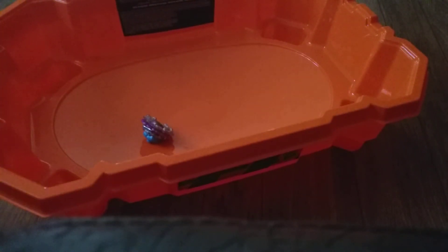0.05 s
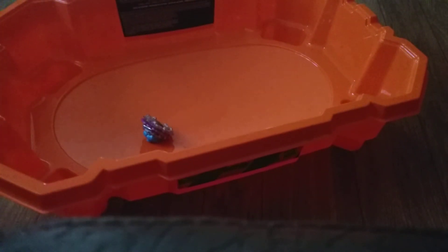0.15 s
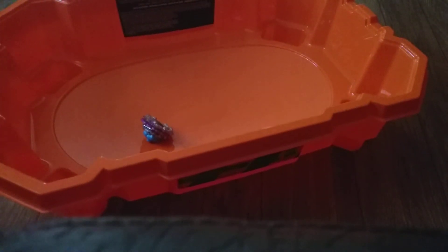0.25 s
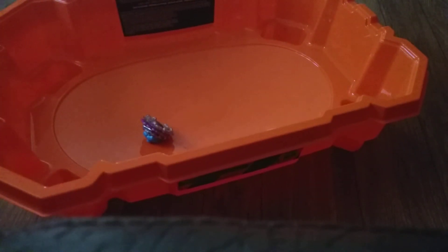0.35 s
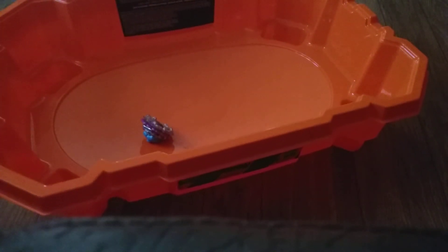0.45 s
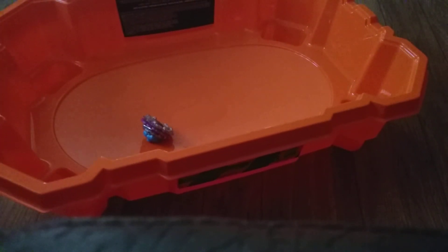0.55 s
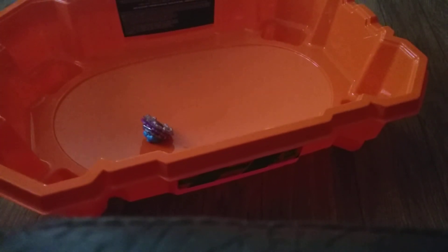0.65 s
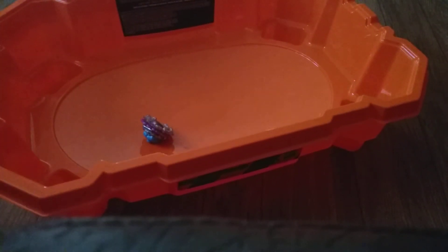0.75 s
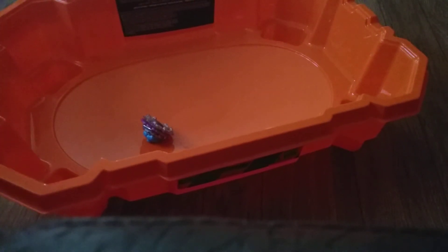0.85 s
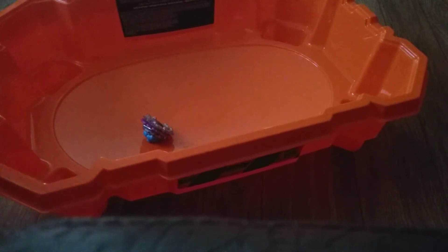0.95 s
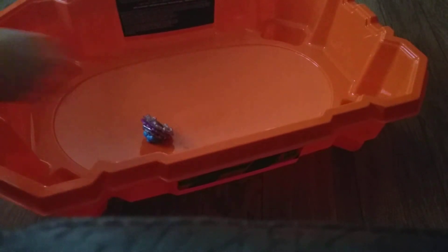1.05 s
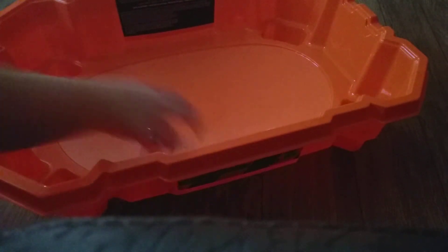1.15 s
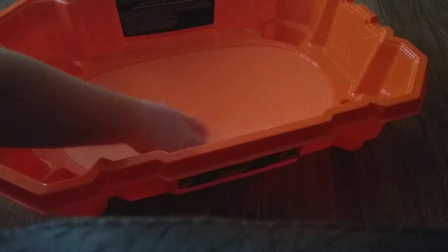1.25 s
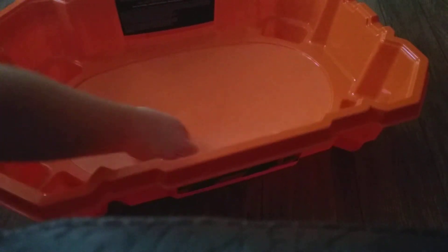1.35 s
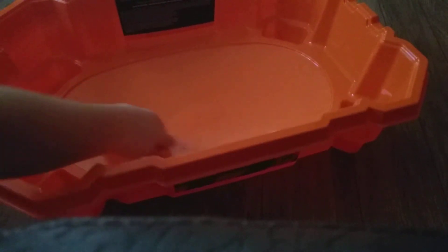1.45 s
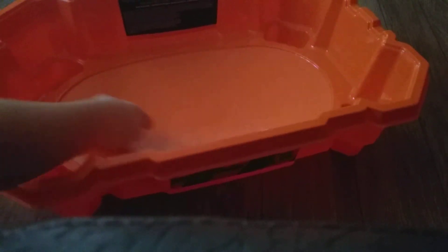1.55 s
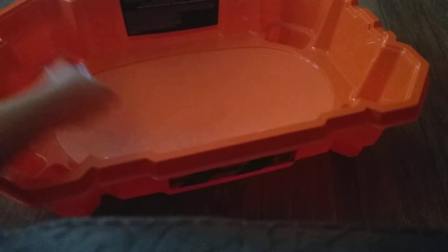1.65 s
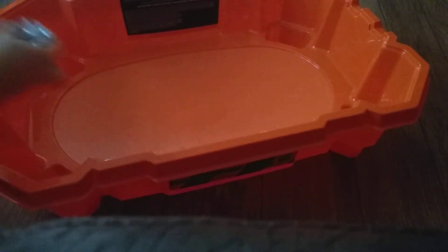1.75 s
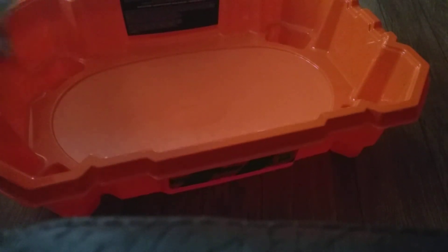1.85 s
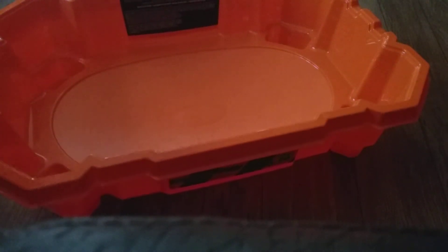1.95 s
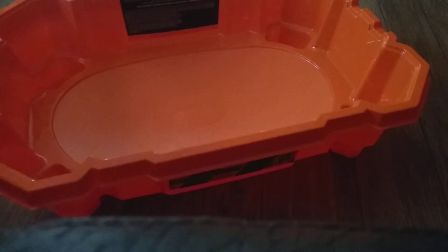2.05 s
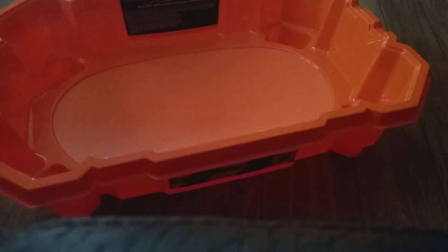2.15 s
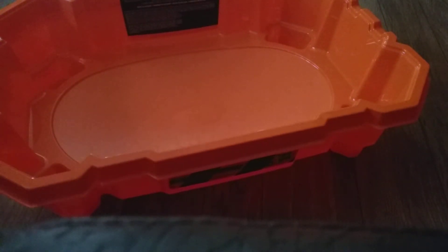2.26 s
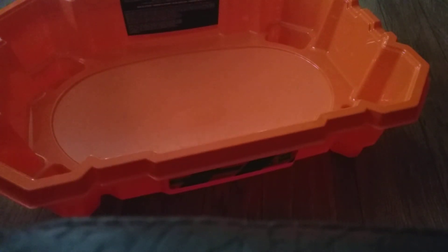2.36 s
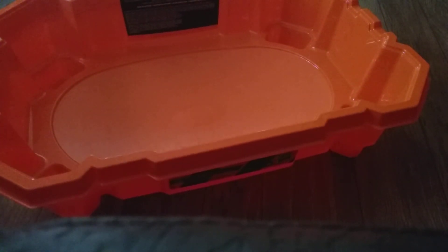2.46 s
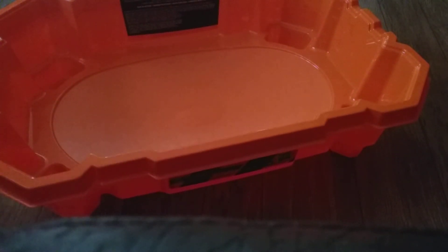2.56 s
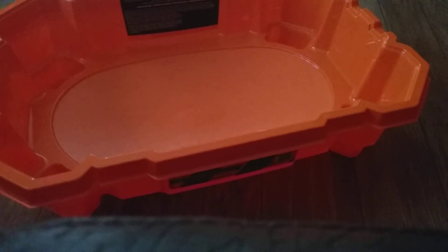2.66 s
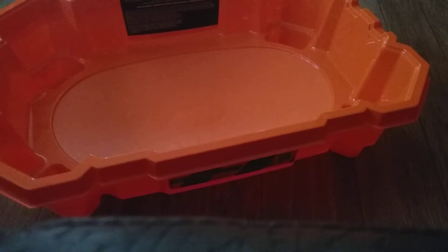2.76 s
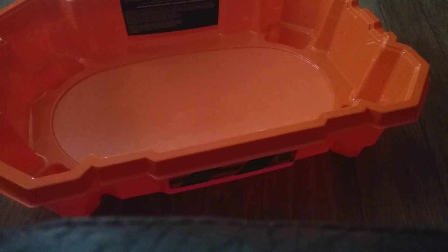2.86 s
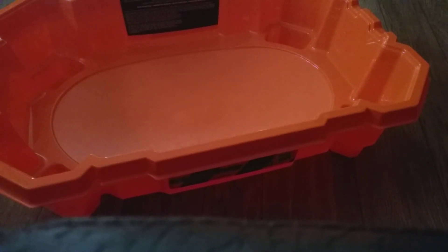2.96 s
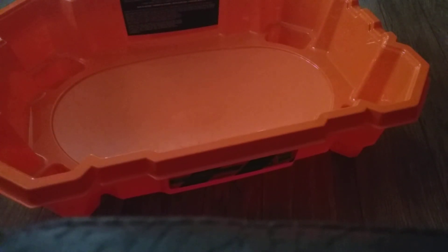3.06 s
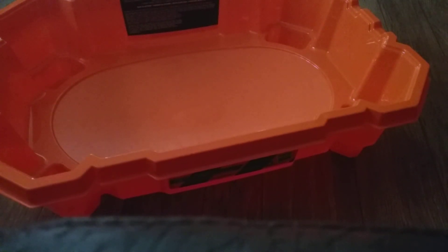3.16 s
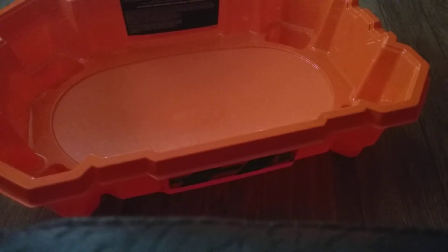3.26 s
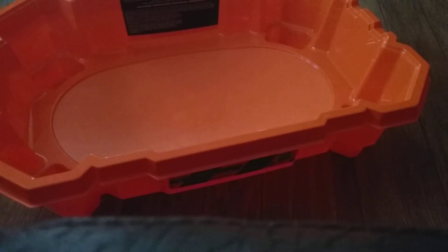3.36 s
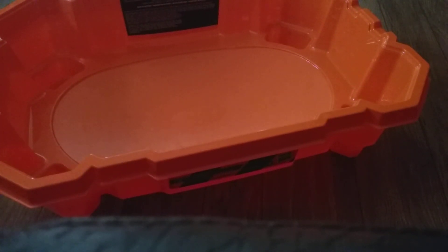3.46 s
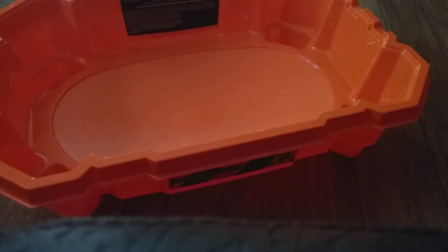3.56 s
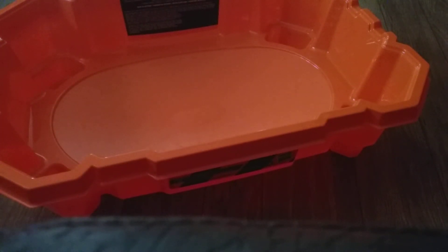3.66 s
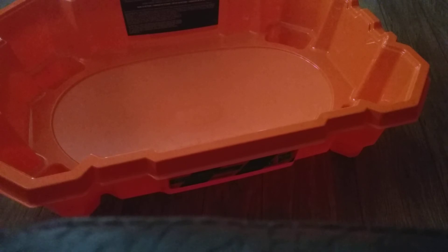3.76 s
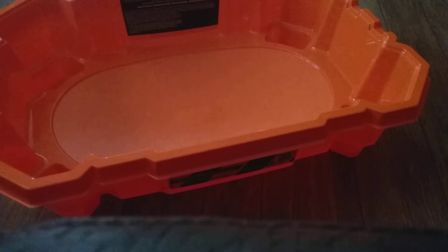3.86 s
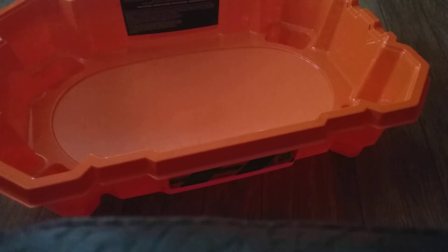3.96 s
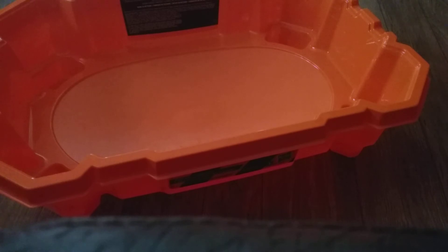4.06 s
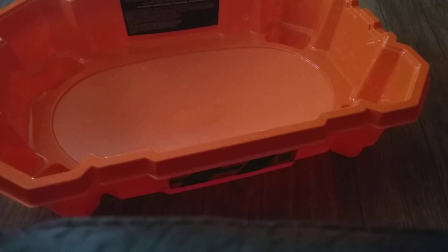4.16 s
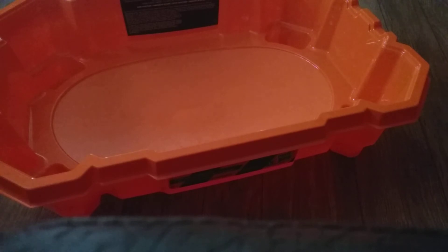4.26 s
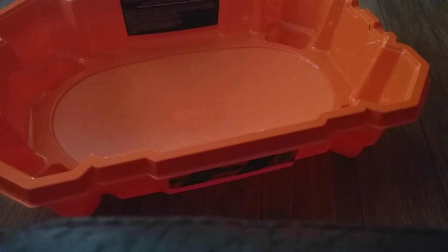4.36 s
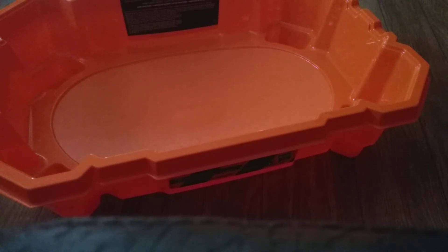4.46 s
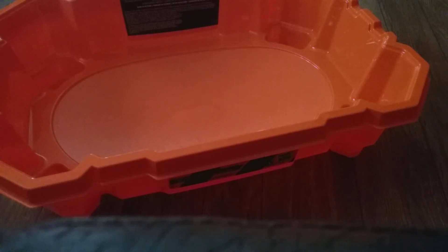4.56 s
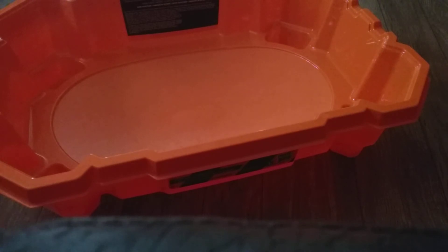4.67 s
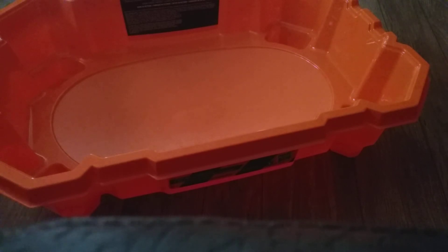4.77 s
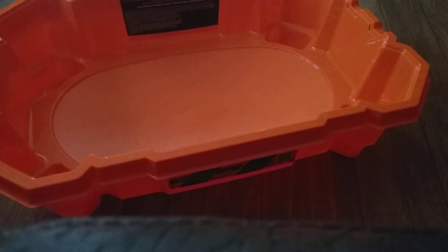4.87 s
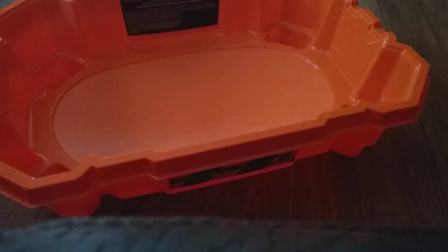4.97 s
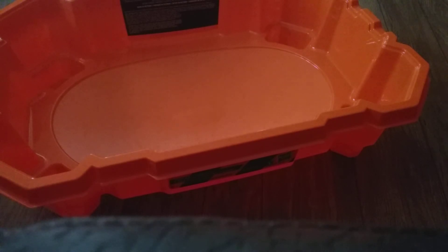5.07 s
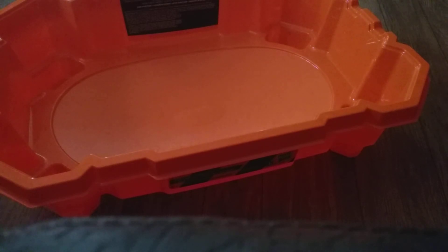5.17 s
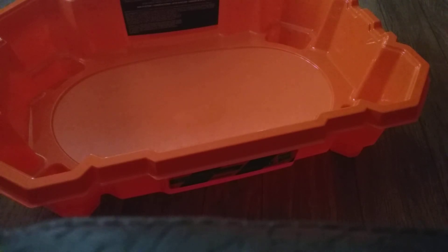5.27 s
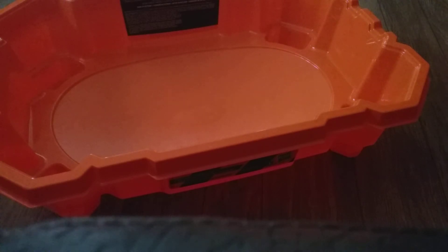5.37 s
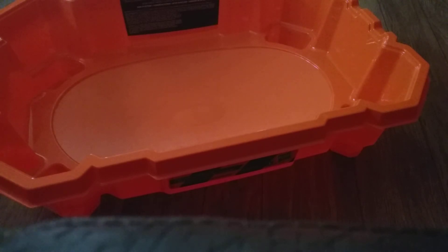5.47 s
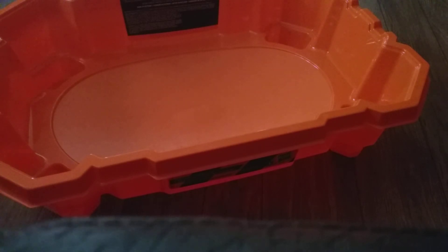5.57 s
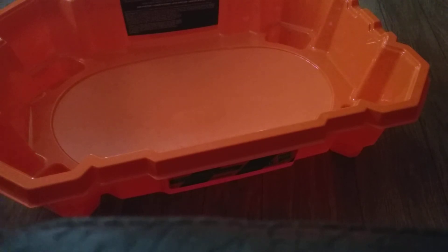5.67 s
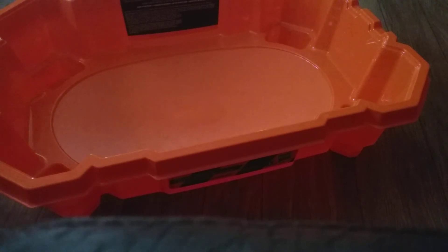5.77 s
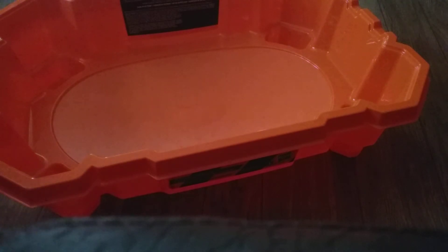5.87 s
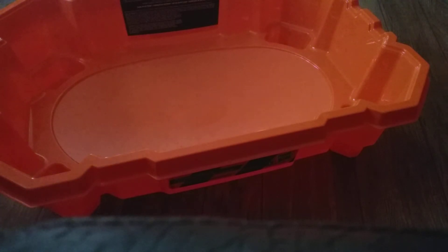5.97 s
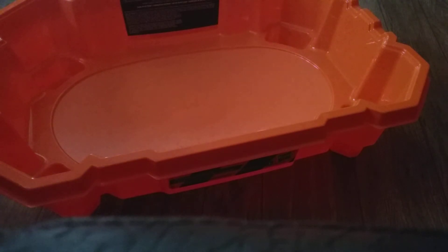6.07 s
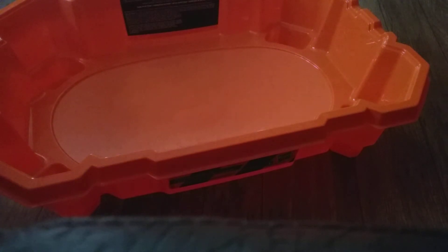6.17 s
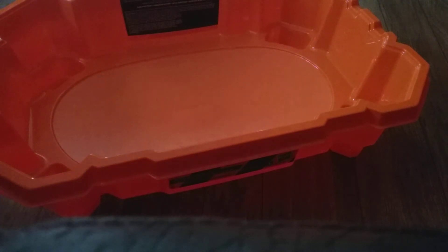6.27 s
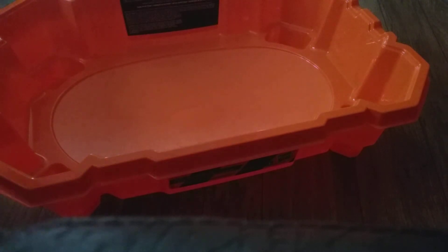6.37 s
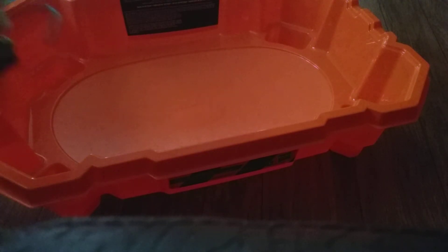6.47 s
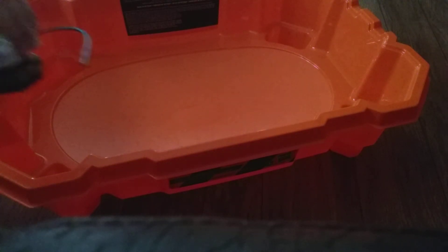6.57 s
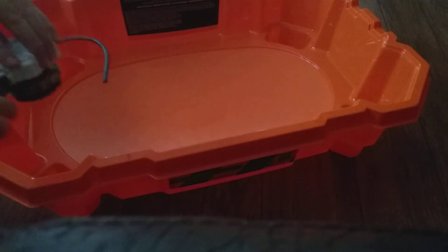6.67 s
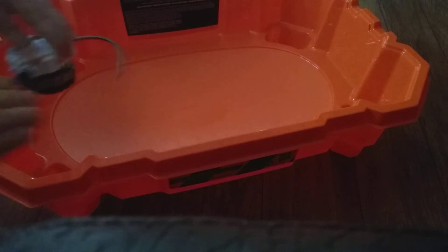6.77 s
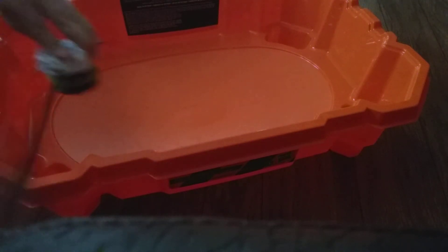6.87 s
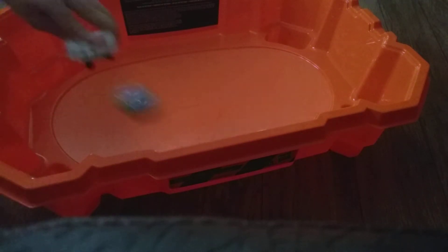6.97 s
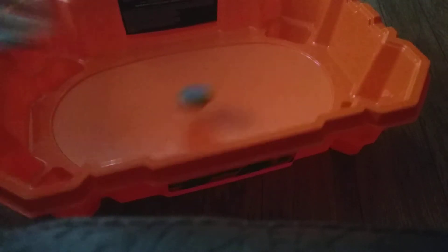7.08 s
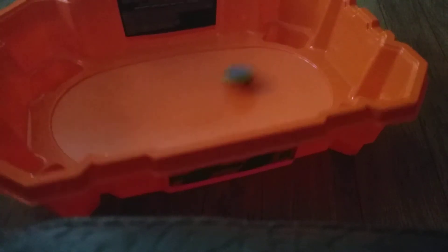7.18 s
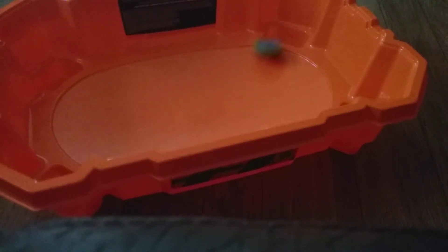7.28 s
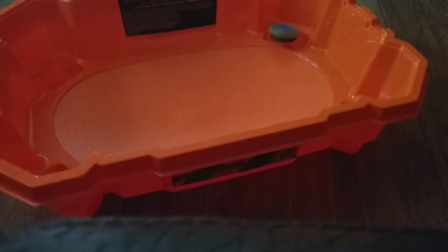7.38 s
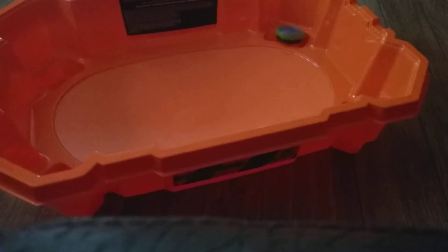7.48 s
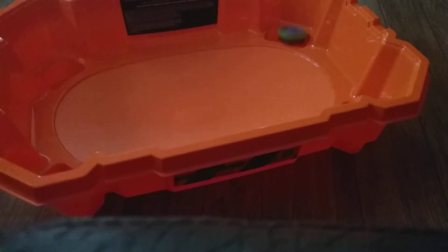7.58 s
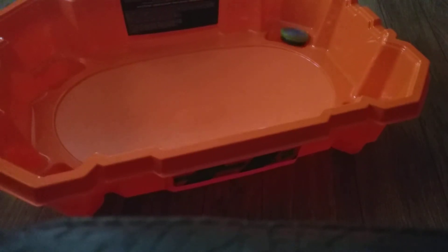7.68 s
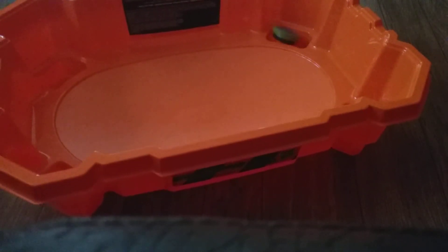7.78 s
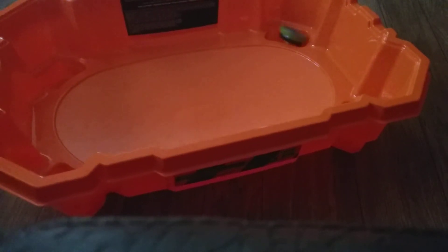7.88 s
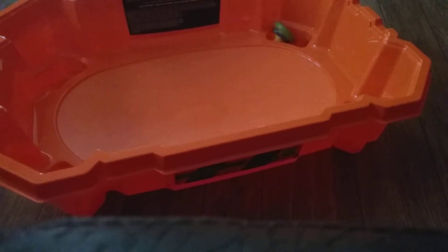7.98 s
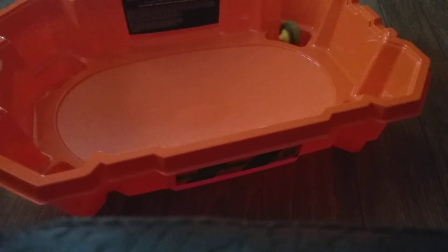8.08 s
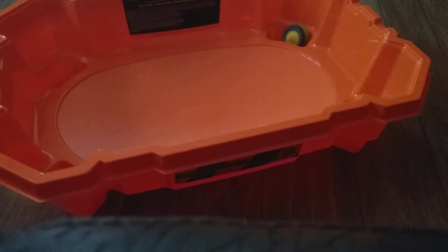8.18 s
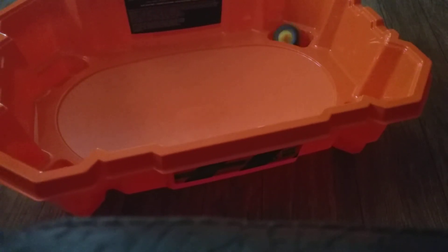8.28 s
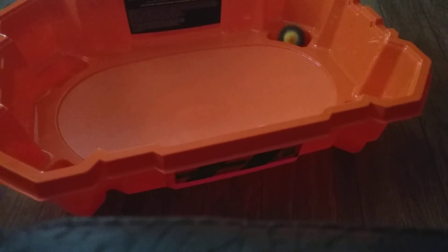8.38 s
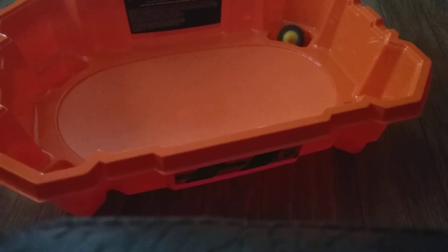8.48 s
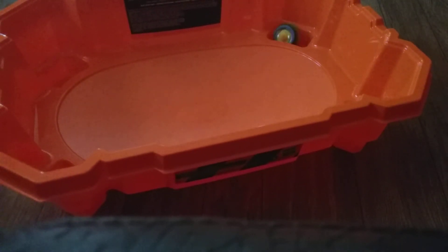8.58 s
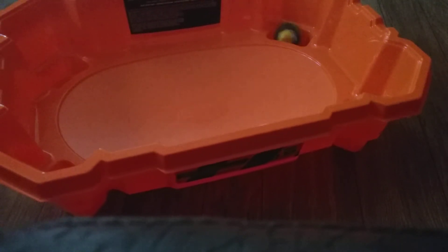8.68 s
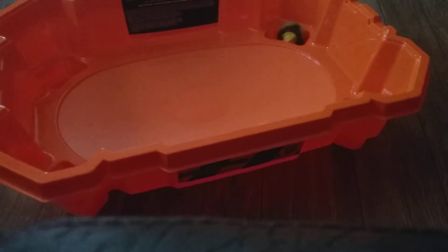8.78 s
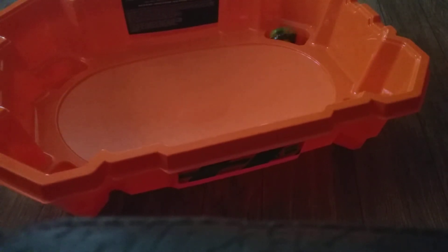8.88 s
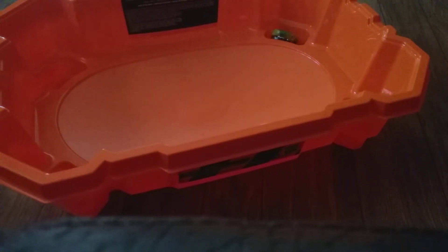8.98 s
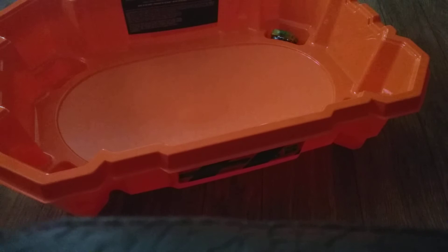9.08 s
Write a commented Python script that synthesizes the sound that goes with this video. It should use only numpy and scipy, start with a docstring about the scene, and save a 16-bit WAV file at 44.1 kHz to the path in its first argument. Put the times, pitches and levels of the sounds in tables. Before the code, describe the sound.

A toothed cord clicks into a toy launcher, gets ripped out, and a spinning top clatters around a hollow plastic tub, chattering and fading in a small room.

```python
"""A spinning top lands in a thin plastic arena, jumps into a pocket, skids, squeals and rattles to rest.
Before that a hand lifts it out and fits it to a launcher, whose toothed cord ratchets in and is ripped.
Noise bursts, random grains and rubbing ring the modes of launcher and arena; short tones add squeals,
thuds and knocks. A puff overloads the microphone. The room is small and furnished, with a low hum."""
import sys
import numpy as np
from scipy import signal
from scipy.fft import rfft, irfft, next_fast_len
from scipy.io import wavfile
from scipy.ndimage import uniform_filter1d

SR = 44100
rng = np.random.default_rng(int(sys.argv[2]) if len(sys.argv) > 2 else 0)


def file_out(sig):
    """Save sig as 16-bit WAV at sys.argv[1]."""
    # one column per channel
    cols = np.atleast_2d(sig).T
    # limit, then scale
    lim = np.clip(cols, -1, 1)
    pcm = np.round(lim * 32767).astype(np.int16)
    wavfile.write(sys.argv[1], SR, pcm)


N = 403074

# Levels in the tables are relative: each source adds its own trim.
# Steady noise spectrum: (frequency [Hz], level per Hz [dB])
NOISE_SPECTRUM = [(18, -56), (30, -28.5), (60, -3), (98, -5), (121, -5), (185, -13), (229, -14), (247, -23),
                  (358, -6), (387, -14.5), (454, -11.5), (591, -27), (3030, -36), (15200, -41),
                  (16400, -56)]
# Wavering hum: (time [s], lower tone level [dB], upper tone level [dB], drone level [dB])
HUM_LEVELS = [(0, -72, -63, -66), (0.997, -75.5, -73, -82.5), (1.6, -72, -61.5, -71.5),
              (2.799, -60, -66.5, -68.5), (3.3, -56, -63, -66.5), (4.002, -61, -68, -73.5),
              (5.503, -66.5, -63.5, -70), (6.4, -78.5, -69.5, -76), (6.851, -68, -65, -69)]
# Hum tones: (frequency [Hz], line width [Hz], level column of the hum counted from 0 [-], level [dB])
HUM_TONES = [(73, 2, 0, -1), (113, 2, 1, -2), (143, 5, 1, -7), (412, 4, 2, -6), (448, 4, 2, -10)]
# Echo strength of the room: (frequency [Hz], level [dB])
ECHO_LEVELS = [(100, -17), (400, -8.5), (1500, -13), (4000, -11), (9000, -10), (15000, -13.5)]
# Echo decay of the room: (frequency [Hz], time to fall 60 dB [s])
ECHO_T60 = [(100, .4), (400, .3), (1500, .25), (4000, .23), (9000, .21), (15000, .13)]
# Air puff on the microphone: (start [s], length of its gusts [s], pressure [full scale], fade constant [s])
PUFF = (6.9165, 0.039, 0.27, 0.029)
# Eddies in the puff: (time [s], pressure drop [dB], width [ms])
EDDIES = [(6.9184, -10.5, 2.4), (6.926, -8, 5.9), (6.936, -11.5, 4.7), (6.949, -11.5, 0.93),
          (6.9559, -9.5, 1.4)]
# Hand and parts set down, the top landing and toppling:
# (time [s], peak level [dB], centre frequency [Hz], time to fall 60 dB [s])
THUDS = [(1.286, -35.5, 170, 0.16), (1.286, -43.5, 625, 0.4), (1.292, -41.5, 124.6, 0.27),
         (1.55, -53, 805, 0.14), (1.55, -55, 119.3, 0.27), (1.685, -50, 104, .25),
         (1.724, -50.5, 135.4, .45), (1.68, -61, 790, 0.25), (4.31, -33, 497, 0.18),
         (4.311, -55, 920, 0.14), (4.312, -44, 138, 0.31), (4.772, -34.5, 212, 0.15), (4.79, -33, 135, 0.2),
         (4.773, -33, 476, 0.13), (5.013, -57, 1009, 0.29), (5.085, -52, 1830, 0.18),
         (7.03, -15.5, 137.6, 0.33), (8.591, -30, 148, 0.31), (8.704, -34, 146.6, 0.26)]
# Small steel spring in the launcher pinging: (time [s], peak level [dB])
PINGS = [(3.256, -42), (4.028, -13.5), (4.047, -5.5), (4.055, -3), (4.078, -11.5), (4.137, -17)]
# Modes of the spring: (frequency [Hz], width [Hz], level [dB])
SPRING_MODES = [(8300, 60, -12), (11565, 30, 0), (12440, 40, -4)]
# Modes of the plastic launcher shell: (frequency [Hz], width [Hz], level [dB])
SHELL_MODES = [(470, 1000, -11.5), (1050, 1700, -8), (2296, 390, 7.5), (3080, 2000, -2.5), (3820, 550, 3.5),
               (4780, 620, 2), (6600, 1700, -10.5), (8620, 870, -3.5), (9850, 960, 1.5), (11490, 860, 2),
               (11380, 720, 5), (13100, 1940, -1), (15800, 1900, -10.5)]
# Hard parts of launcher and top clicking:
# (time [s], peak level [dB], body against treble [dB], leading body mode [Hz])
CLICKS = [(0.011, -27.5, -16, 2400), (0.031, -39, -12, 2400), (0.1482, -26.5, -5, 2390),
          (0.1672, -7.5, -18, 3580), (0.1805, -23, -5.5, 3850), (0.184, -26.5, -14, 3740),
          (0.3116, -19, -19.5, 2400), (0.32, -17, -15.5, 2460), (0.373, 3, -15, 4780),
          (0.3874, -19.5, -17, 3840), (0.406, 1.5, -21, 2320), (0.4322, 2.5, -18.5, 3820),
          (0.4586, 1, -16.5, 3800), (0.475, 3, -22.5, 2320), (0.4947, 2.5, -15, 4240),
          (0.516, -2.5, -22.5, 2420), (0.5368, 3, -19, 3940), (0.549, -22.5, -2, 4560),
          (1.325, -44, -3, 2840), (1.3582, -34, -13.5, 2600), (1.453, -30.5, -19, 2630),
          (1.8292, -28.5, -30, 2700), (1.852, -23, -41, 4400), (1.8761, -32, -24, 2560),
          (1.895, -45, -0.5, 1950), (1.938, -47.5, -3, 1840), (2.002, -29, -36, 5500),
          (2.025, -29, -19.5, 5420), (2.038, -33, -14, 4880), (2.208, -26.5, -13.5, 4280),
          (2.308, -14, -15.5, 2250), (2.3184, -9, -21, 4020), (2.39, -23.5, -31, 2340),
          (2.508, -50, -8, 2610), (2.5633, -36, -13.5, 5170), (2.8259, -31, -31, 2500),
          (2.883, -48, -11.5, 2200), (2.9443, -34.5, -14.5, 5200), (3.196, -32, -20.5, 3150),
          (3.234, -15, -20, 2400), (3.255, -22.5, -9.5, 2400), (3.2617, -19, -20, 2220),
          (3.3073, -39, -26, 2340), (3.3613, -30.5, -19, 2390), (3.383, -30, -19, 2370),
          (3.498, -44, -9, 2450), (3.5142, -38, -10, 4600), (3.525, -26, -19, 3620),
          (3.5778, -33, -13.5, 2430), (3.5912, -24, -16.5, 2670), (3.681, -26, -19, 2000),
          (3.702, -32, -7.5, 2470), (3.716, -25, -13.5, 2540), (3.738, -40, -7.5, 2500),
          (3.8199, -8.5, -15.5, 4900), (3.8424, -2, -15.5, 5000), (3.85, -11.5, -12.5, 2210),
          (3.863, -2, -15.5, 4930), (3.8792, -3.5, -16, 4950), (3.8946, 1, -21.5, 2050),
          (3.91, -3.5, -13, 4500), (3.9383, -2, -15.5, 4800), (3.975, 0, -13.5, 3930),
          (4.019, 1.5, -19, 2170), (4.025, 1.5, -26, 4190), (4.0395, -8.5, -32, 4200),
          (4.045, -1, -16, 3750), (4.0534, -3, -22.5, 2420), (4.0769, 3, -17, 3740),
          (4.088, -8, -30.5, 3860), (4.128, -1, -20, 4460), (4.1387, -4, -20, 2770),
          (4.287, -31.5, -20.5, 4850), (4.7537, -45, -30, 4860), (4.775, -8.5, -29, 5130),
          (5.01, -27, -17.5, 5000), (5.082, -31.5, -12, 2330), (5.349, -52.5, -5.5, 2430),
          (5.618, -51.5, -5, 2470), (5.7124, -1.5, -21.5, 2500), (5.74, 4, -16.5, 4200),
          (5.769, 2, -17, 3820), (5.8035, 1.5, -20, 2400), (5.831, 0, -16, 4480), (5.853, 2.5, -18, 4800),
          (5.8824, 1, -20, 4740), (5.907, -0.5, -15.5, 4070), (5.9398, 4, -18.5, 4770),
          (6.124, -32, -25, 4040), (6.1633, -40.5, -33, 3670), (6.188, -42.5, -24, 4810),
          (6.77, -24.5, -22, 2400), (6.911, -22, -3.5, 4850), (6.917, -6.5, -16, 4600),
          (9.0275, -41.5, -13.5, 1930), (9.0677, -42, -10.5, 1930), (9.1157, -39.5, -19, 2440)]
# Fingers and sliding parts rubbing:
# (loudest time [s], level [dB], rise [s], fall [s], body against treble [dB])
RUBS = [(1.18, -59, 0.074, .1, -13), (1.31, -47.5, 0.029, 0.13, -8), (1.48, -59, .1, 0.078, -24),
        (1.58, -58, .08, 0.043, -17), (1.87, -45.5, 0.087, 0.091, -9.5), (2.02, -43.5, 0.09, 0.11, -11.5),
        (2.86, -60.5, 0.16, .12, -11.5), (3.729, -45.5, 0.065, 0.021, -7.5),
        (4.72, -58.5, 0.31, 0.094, -23.5), (4.784, -24, 0.0095, 0.098, -10.5),
        (5.04, -46, 0.034, 0.094, -6.5), (5.538, -62, 0.21, 0.12, -5.5)]
# Cord teeth racing through the gear: (time [s], level [dB])
RIP_LEVELS = [(6.77, -53.5), (6.815, -40), (6.84, -19.5), (6.95, -12.5), (7.0, -17)]
# Modes of the arena, from low boom through wall modes to rim crack: (frequency [Hz], width [Hz], level [dB])
ARENA_MODES = [(108, 5.7, 13), (137.2, 20, 19), (210, 30, 20.5), (307, 44, 16), (385, 33, 17.5),
               (588, 41, 13.5), (652, 63.4, 13), (727, 92, 13.5), (894, 51, 13), (960, 61, 9),
               (1181, 167, 13), (1350, 116, 12.5), (1810, 580, 9), (3134, 620, 8.5), (4160, 1940, 6),
               (5530, 4600, 0.5), (9440, 1880, 6), (11700, 3630, 4), (14800, 2500, 2)]
# Hand brushing the arena: (loudest time [s], level [dB], rise [s], fall [s], boom against walls [dB])
BRUSHES = [(1.29, -53, 0.037, 0.25, -2), (1.45, -74, 0.27, 0.056, -32), (1.72, -75.5, 0.24, 0.37, -5)]
# Spinning rim sticking and slipping on the pocket wall: (time [s], level [dB], slip rate [1/s])
SQUEALS = [(7.438, -20, 1005), (7.536, -34, 980), (7.589, -24.5, 1080), (7.639, -18, 988),
           (7.699, -22, 1030), (7.739, -24.5, 950), (7.906, -25, 1130), (8.055, -32.5, 1050)]
# Multiples 1 to 5 of the slip rate: (level [dB])
SQUEAL_PARTIALS = [-3, -9.5, -2.5, -8, -11]
# Top scraping and chattering between blows: (time [s], level [dB])
CHATTER_LEVELS = [(7.04, -33), (7.16, -52), (7.3, -51), (7.45, -48), (7.57, -39), (7.7, -26.5),
                  (7.86, -36.5), (7.95, -26.5), (8.17, -35.5), (8.3, -34.5), (8.53, -51), (8.6, -38.5),
                  (8.72, -55), (8.85, -59.5), (9.0, -67.5)]
# Blows of the top on the arena: (time [s], peak level [dB], crack level [dB], leading wall mode [Hz])
BLOWS = [(7.027, -16.5, -2.5, 800), (7.174, -24.5, -4, 720), (7.234, -37.5, 1.5, 940),
         (7.27, -17.5, -11.5, 824), (7.29, -11.5, -5.5, 735), (7.341, -23, -4, 737),
         (7.437, -10.5, -11, 840), (7.447, -8.5, -7.5, 1004), (7.452, -12, -11, 1450),
         (7.481, -19, -2, 567), (7.534, -9.5, -10, 1020), (7.591, -14, -9.5, 1100), (7.617, -16, -6.5, 990),
         (7.682, -11, -5, 590), (7.744, -21.5, 1, 920), (7.773, -7.5, -11, 706), (7.785, -7, -15, 705),
         (7.804, -14, -5, 795), (7.881, -10, -4.5, 885), (7.901, -7, -17, 726), (7.917, -5, -16, 898),
         (7.958, -22, -12, 685), (7.981, -11, -16, 820), (7.988, -6.5, -19, 865), (8.001, -4, -20, 786),
         (8.019, -16.5, -12, 730), (8.06, -16.5, -24, 594), (8.068, -13.5, -24, 690),
         (8.097, -11.5, -22, 630), (8.123, -15.5, -4.5, 645), (8.187, -11.5, -8.5, 692),
         (8.214, -15.5, -13, 1230), (8.253, -16, -16, 618), (8.29, -17, -23, 900), (8.331, -25.5, -21, 580),
         (8.372, -16.5, -11, 606), (8.399, -26.5, -7, 557), (8.441, -21, -27, 688), (8.454, -21, -6, 1450),
         (8.497, -26.5, -12, 590), (8.556, -23, -12, 558), (8.631, -25.5, -7.5, 640),
         (8.657, -21.5, -8, 648), (8.699, -35, -3, 580), (8.747, -31.5, -7.5, 1285),
         (8.829, -40.5, -7, 1330), (8.878, -32, -5.5, 838), (8.935, -39.5, -11, 754)]

NOISE_DB = -68
DRONE_HZ, DRONE_WIDTH_HZ = 430, 260
FIRST_ECHO_S, BUILD_S = 0.0051, 0.00029
# before the nearest wall answers, only the table does; then a boost that fades
WALL_ECHO_S, WALL_ECHO_FADE_S, WALL_ECHO_DB, EARLY_DB = 0.0125, 0.0062, 0.5, -5.5
BASS_CUT_HZ, TREBLE_CUT_HZ = 53, 16650
SCATTER_DB = 1.5   # random spread of each mode from contact to contact
STROKE_DB = 20   # drop one rise before and one fall after the loudest moment
THUD_TONE, TONE_BELOW_HZ = 0.55, 700   # clear-tone share of a low thud; higher thuds are all noise
RUB_DAMPING = 2.5   # the touch widens the shell modes this many times
RIP_BODY_DB = -9
RIP_LOW_RAMP_S, RIP_LOW_DB = (6.2, 6.9), -7.5   # lowest shell modes: ramp from 0 dB, mostly done as the rip starts
RING_DB, RING_T60_S = -1, 0.011   # own tone of the part that clicks
KNOCK_DB, KNOCK_T60_S = -3.5, 0.037   # own tone of the patch of wall that is hit
SKID_S, SQUEAL_RING_T60_S = 0.0077, 0.12   # the wall rings on at the slip rate
POCKET_ENTRY_S = 7.36   # the top leaves the floor for the pocket
FLOOR_BOOM_DB, POCKET_BOOM_DB = 4, -5.5   # at the reference chatter level
BOOM_LAG, BOOM_REFERENCE_DB = 0.34, -47.0   # share of a swell in chatter that the boom misses
CONTACT_MS, SHORTER_MS_PER_DB = 7.07, 0.11   # fade constant of a 0 dB blow; weaker ones are shorter
WALL_FOCUS_DB = 18   # loss per octave away from the leading wall mode
OVERTONE, OVERTONE_DB = 2.21, -3   # a wall mode sounds with its partner at this ratio
BRUSH_CRACK_DB, CHATTER_CRACK_DB = 1.5, 4.5


def amp(db):
    """Gain of a level in dB."""
    return 10 ** (np.asarray(db) / 20)


def unit(x):
    """Signal scaled to rms 1."""
    return x / np.sqrt(np.mean(x ** 2) + 1e-20)


def resonate(x, hz, width_hz):
    """Two-pole resonance with gain 1 at its peak."""
    r = np.exp(-np.pi * width_hz / SR)
    zeros = np.array([1, 0, -1]) * (1 - r * r) / 2
    poles = [1, -2 * r * np.cos(2 * np.pi * hz / SR), r * r]
    return signal.lfilter(zeros, poles, x + 1e-18)


def strike(times, contact_ms, rise_ms, mode_db, modes):
    """Each contact is a short burst of micro-impacts that drives every mode at its own strength."""
    ms = np.arange(1200) / SR * 1000
    shape = np.minimum(ms / rise_ms, 1) * np.exp(-ms / np.clip(contact_ms, 0.5, 8))
    bursts = rng.standard_normal((len(times), len(ms))) * shape
    gains = amp(mode_db + SCATTER_DB * rng.standard_normal((len(times), len(modes))))
    at = (np.asarray(times)[:, None] * SR).astype(int) + np.arange(len(ms))
    out = np.zeros(N)
    for k, (hz, width_hz, _) in enumerate(modes):
        # even out the luck of the noise: every burst hands the mode a like share
        share = np.std(resonate(bursts, hz, width_hz), axis=1)
        drive = bursts * (gains[:, k] * share.mean() / share)[:, None]
        line = np.bincount(at.ravel(), drive.ravel(), N + len(ms))[:N]
        out += (-1) ** k * resonate(line, hz, width_hz)
    return out


def grains(per_s, spread_db):
    """Random clicks of uneven size, rms 1."""
    sizes = amp(spread_db * np.minimum(rng.exponential(1, N), 4)) * rng.choice([-1, 1], N)
    return unit(sizes * (rng.random(N) < per_s / SR))


def stroke(s, db, rise_s, fall_s):
    """Samples around a stroke and its level there: straight up, then straight down in dB."""
    near = slice(int((s - 3 * rise_s) * SR), int((s + 3 * fall_s + 0.1) * SR))
    t = (np.arange(N) / SR)[near] - s
    return near, db - STROKE_DB * np.maximum(-t / rise_s, t / fall_s)


def along(rows):
    """Samples around a level curve and the level there, fading out fast beyond its ends."""
    s, level = np.transpose(rows)
    near = slice(int(s[0] * SR) - 4000, int(s[-1] * SR) + 8000)
    t = (np.arange(N) / SR)[near]
    outside_s = np.maximum(np.maximum(s[0] - t, t - s[-1]), 0)
    return near, np.interp(t, s, level) - 900 * outside_s


def rings(rows, t60, rise_s):
    """One dying sine for each (time [s], level [dB], frequency [Hz])."""
    out, t = np.zeros(N + SR), np.arange(SR // 8) / SR
    for s, db, hz in rows:
        envelope = amp(db - 60 * t / t60) * np.minimum(t / rise_s, 1)
        out[int(s * SR):][:len(t)] += np.sin(2 * np.pi * hz * t) * envelope
    return out[:N]


def background():
    """Steady room and microphone noise, hum tones whose pitch wanders a little, and a noisy drone."""
    hz, db = np.transpose(NOISE_SPECTRUM)
    size, t = next_fast_len(N), np.arange(N) / SR
    f = np.arange(size // 2 + 1) * SR / size + 1   # 1 Hz up keeps the logarithm finite
    spectrum = rfft(rng.standard_normal(size)) * amp(np.interp(np.log(f), np.log(hz), db))
    out = amp(NOISE_DB) * unit(irfft(spectrum, size)[:N])
    s, *levels = np.transpose(HUM_LEVELS)
    for tone_hz, width_hz, column, db in HUM_TONES:
        walk = uniform_filter1d(np.cumsum(rng.standard_normal(N)), size=2000)
        wander = walk * np.sqrt(2 * np.pi * width_hz / SR)
        tone = np.sqrt(2) * np.sin(2 * np.pi * tone_hz * t + wander)
        out += tone * amp(db + np.interp(t, s, levels[column]))
    drone = resonate(rng.standard_normal(N), DRONE_HZ, DRONE_WIDTH_HZ)
    drone = resonate(drone, DRONE_HZ, 2 * DRONE_WIDTH_HZ)
    return out + unit(drone) * amp(np.interp(t, s, levels[-1]))


def room(x):
    """Dense echoes build up after a short gap and die faster in the treble."""
    t = np.arange(SR // 2) / SR
    edges = np.geomspace(50, 18000, 14)
    t60_hz, t60_s = np.transpose(ECHO_T60)
    level_hz, level_db = np.transpose(ECHO_LEVELS)
    tail = np.zeros(len(t))
    for low, high in zip(edges, edges[1:]):
        centre = np.log(low * high) / 2
        t60 = np.interp(centre, np.log(t60_hz), t60_s)
        db = np.interp(centre, np.log(level_hz), level_db)
        band_pass = signal.butter(2, [low, high], "band", fs=SR, output="sos")
        band = signal.sosfilt(band_pass, rng.standard_normal(len(t)))
        tail += band * amp(db - 22.5 - 60 * t / t60)
    wall_db = WALL_ECHO_DB * np.exp((WALL_ECHO_S - t) / WALL_ECHO_FADE_S)
    tail = tail * amp(np.where(t < WALL_ECHO_S, EARLY_DB, wall_db))
    return signal.fftconvolve(x, tail * np.clip((t - FIRST_ECHO_S) / BUILD_S, 0, 1))[:N]


def puff(sound):
    """A gust pushes the diaphragm out, where it stiffens and passes little; eddies pull it back briefly."""
    t = np.arange(N) / SR
    start, length, pressure, fade = PUFF
    push = pressure * np.clip((t - start) / 0.0023, 0, 1) * np.exp(-np.maximum(t - start, 0) / fade)
    for s, depth_db, ms in EDDIES:
        push -= amp(depth_db) * np.exp(-((t - s) * 2000 / ms) ** 2)
    gusts = unit(resonate(rng.standard_normal(N), 460, 720)) * ((t > start) & (t < start + length))
    stiffness = 1 + (np.maximum(push, 0) / 0.11) ** 6
    return push + (sound + 0.14 * gusts) / stiffness


def thuds():
    """Soft contacts: dying noise in one broad resonance, the low ones mixed with a dying tone."""
    out, t = np.zeros(N), np.arange(SR // 4) / SR
    for s, peak_db, hz, t60 in THUDS:
        body = rng.standard_normal(len(t))
        for relative_width in (0.3, 1.5, 2.4):
            body = resonate(body, hz, relative_width * hz)
        tone = THUD_TONE * (hz < TONE_BELOW_HZ)
        body = (1 - tone) * unit(body) + tone * np.sin(2 * np.pi * hz * t)
        envelope = amp(peak_db - 60 * t / t60) * np.minimum(t * hz / 0.42, 1)   # rises in 0.42 cycle
        out[int(s * SR):][:len(t)] += body * envelope
    return out


def spring():
    """Some ratchet teeth set the narrow steel modes of the spring ringing."""
    s, peak_db = np.transpose(PINGS)
    mode_db = peak_db[:, None] + 22 + np.array(SPRING_MODES)[:, 2]
    return strike(s, 1.5, 0.5, mode_db, SPRING_MODES)


def ring_shell(drive, low_db, dull_db, lowest_db, damping):
    """A moving touch drives all shell modes, balanced between body (below 6 kHz) and treble."""
    out = np.zeros(len(drive))
    for k, (hz, width_hz, mode_db) in enumerate(SHELL_MODES):
        db = mode_db + (hz < 6000) * low_db + dull_db * (hz > 13000) + lowest_db * (hz < 3500)
        out += (-1) ** k * resonate(drive * amp(db), hz, damping * width_hz)
    return out


def rubs():
    """Fingers and sliding parts rub in fine uneven grains; the touch damps the shell, its top modes most weakly driven."""
    out = np.zeros(N)
    friction = grains(7800, spread_db=2.0) * amp(-0.5)
    for *row, low_db in RUBS:
        near, db = stroke(*row)
        drive = friction[near] * amp(db)
        out[near] += ring_shell(drive, low_db, dull_db=-7, lowest_db=0, damping=RUB_DAMPING)
    return out


def clicks():
    """Hard parts strike the shell; each favours its own body mode, and light touches are duller."""
    hz, _, level_db = np.transpose(SHELL_MODES)
    s, peak_db, body_db, lead_hz = np.transpose(CLICKS)[:, :, None]
    octaves = np.abs(np.log2(np.maximum(hz, 2000) / lead_hz))
    body_db = (hz < 6000) * (body_db + 11.5 - 7.0 * octaves)
    dull_db = 0.038 * peak_db * (hz > 13000)
    return strike(s[:, 0], 2.34, 0.27, peak_db - 1.0 + level_db + body_db + dull_db, SHELL_MODES)


def rip():
    """The ripped cord: a dense, swelling rush of tooth grains, weak in the lowest shell modes."""
    out = np.zeros(N)
    teeth = grains(6000, spread_db=-10.0) * amp(3)
    near, db = along(RIP_LEVELS)
    lowest_db = np.interp((np.arange(N) / SR)[near], RIP_LOW_RAMP_S, (0, RIP_LOW_DB))
    drive = teeth[near] * amp(db)
    out[near] += ring_shell(drive, RIP_BODY_DB, dull_db=-1, lowest_db=lowest_db, damping=1)
    return out


def own_tones():
    """After each click the part rings briefly at its leading mode, after each blow the patch of wall."""
    parts = [(s, peak_db + body_db + RING_DB, hz) for s, peak_db, body_db, hz in CLICKS]
    wall = [(s, peak_db + KNOCK_DB, hz) for s, peak_db, _, hz in BLOWS]
    return rings(parts, RING_T60_S, rise_s=0.00081) + rings(wall, KNOCK_T60_S, rise_s=0.0017)


def squeals():
    """Each stick-slip skid is a short, slightly unsteady harmonic buzz; its lowest partial rings on."""
    out, t = np.zeros(N), np.arange(SR // 8) / SR
    rise, after = np.minimum(t / 0.0021, 1), np.maximum(t - SKID_S, 0)
    for s, db, hz in SQUEALS:
        unsteady = unit(uniform_filter1d(rng.standard_normal(len(t)), size=90))
        phase = 2 * np.pi * np.cumsum(hz * (1 + 0.013 * unsteady)) / SR
        for k, partial_db in enumerate(SQUEAL_PARTIALS):
            t60 = SQUEAL_RING_T60_S if k == 0 else 0.012
            envelope = rise * amp(db + partial_db - 60 * after / t60)
            out[int(s * SR):][:len(t)] += np.sin((k + 1) * phase) * envelope
    return out


def wall_share(hz, lead_hz):
    """Level of a wall mode in dB: highest at the leading mode, nearly as high at its partner."""
    octaves = np.abs(np.log2(hz / lead_hz))
    lead_db = -WALL_FOCUS_DB * octaves
    partner_db = OVERTONE_DB - WALL_FOCUS_DB * np.abs(octaves - np.log2(OVERTONE))
    return 5 + np.maximum(lead_db, partner_db)


def boom_share(t):
    """Boom under the top, in dB against the walls: the floor booms, the pocket hardly does."""
    chatter_db = np.interp(t, *np.transpose(CHATTER_LEVELS))
    place_db = np.where(t > POCKET_ENTRY_S, POCKET_BOOM_DB, FLOOR_BOOM_DB)
    return place_db - BOOM_LAG * (chatter_db - BOOM_REFERENCE_DB)


def scrapes():
    """Chatter of the top and brushes of the hand: noisy touches of a few ms ring boom, walls and crack."""
    out, t = np.zeros(N), np.arange(N) / SR
    touches = signal.lfilter([1], [1, -0.99], np.abs(grains(260, spread_db=3.0)))
    scrape = unit(touches * rng.standard_normal(N))
    blow_s, _, _, blow_hz = np.transpose(BLOWS)
    lead_hz = np.interp(t, blow_s, blow_hz, left=800)
    near, db = along(CHATTER_LEVELS)
    moves = [(near, db, CHATTER_CRACK_DB, boom_share(t[near]))]
    moves += [(*stroke(*row), BRUSH_CRACK_DB, boom_db) for *row, boom_db in BRUSHES]
    for near, db, crack_db, boom_db in moves:
        for k, (hz, width_hz, mode_db) in enumerate(ARENA_MODES):
            if hz > 1700:
                part_db = crack_db - 8.5
            elif hz < 450:
                part_db = boom_db - 4.0
            else:
                part_db = wall_share(hz, lead_hz[near])
            drive = scrape[near] * amp(db + 4.5 + mode_db + part_db)
            out[near] += (-1) ** k * resonate(drive, hz, width_hz)
    return out


def blows():
    """The top hits the thin arena: where it hits decides which wall mode leads, its rim adds the crack."""
    hz, _, level_db = np.transpose(ARENA_MODES)
    s, peak_db, crack_db, lead_hz = np.transpose(BLOWS)[:, :, None]
    low_db = np.where(hz < 450, boom_share(s) - 10.5, wall_share(hz, lead_hz))
    part_db = np.where(hz > 1700, crack_db, low_db)
    contact_ms = CONTACT_MS + SHORTER_MS_PER_DB * peak_db
    return strike(s[:, 0], contact_ms, 0.83, peak_db + 3.5 + level_db + part_db, ARENA_MODES)


def scene():
    """Everything on the table, its room and the background, heard through the puff."""
    launcher = clicks() + rip() + rubs() + spring()
    arena = blows() + scrapes() + squeals()
    near = launcher + arena + own_tones() + thuds()
    return puff(near + room(near) + background())[None]


def record(dry):
    """Bass and extreme treble are cut; peaks beyond full scale clip."""
    bass_cut = signal.butter(2, BASS_CUT_HZ, "high", fs=SR, output="sos")
    treble_cut = signal.cheby2(12, 60, TREBLE_CUT_HZ, fs=SR, output="sos")
    return np.clip(signal.sosfilt(treble_cut, signal.sosfilt(bass_cut, dry)), -1, 1)


dry = scene()
out = record(dry)
file_out(out)
```